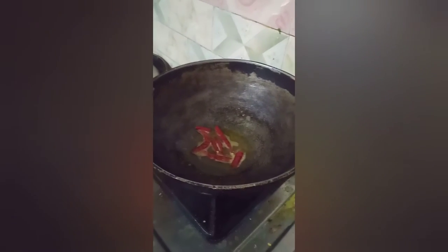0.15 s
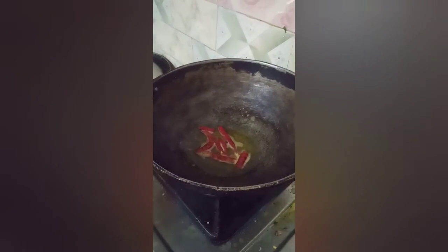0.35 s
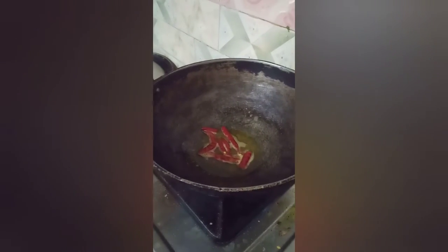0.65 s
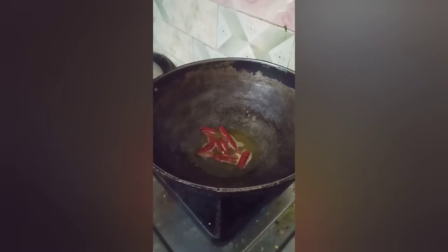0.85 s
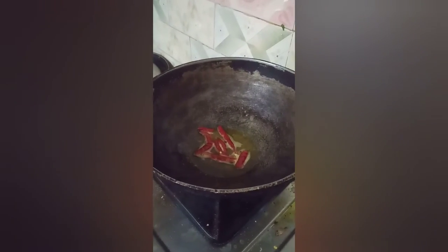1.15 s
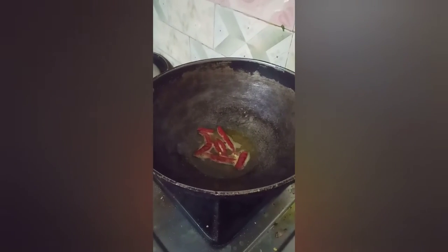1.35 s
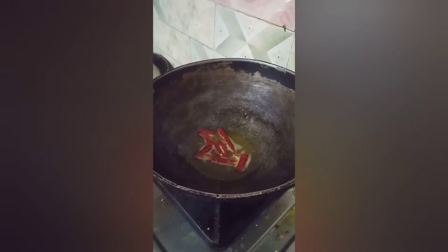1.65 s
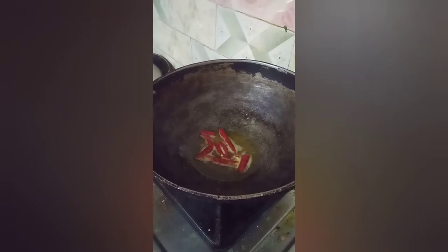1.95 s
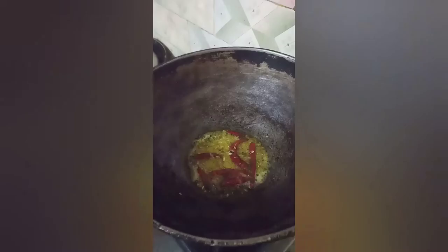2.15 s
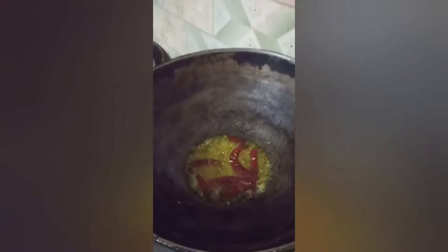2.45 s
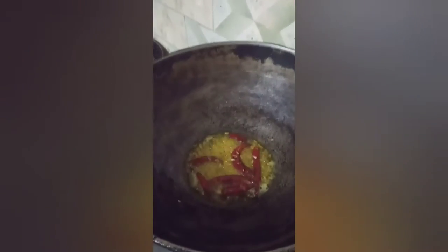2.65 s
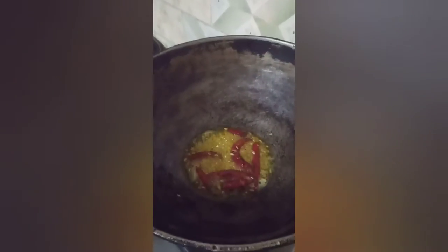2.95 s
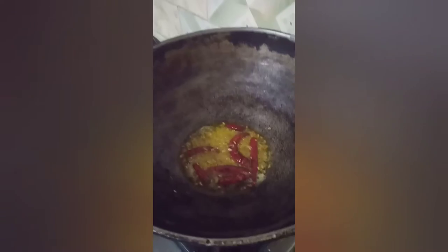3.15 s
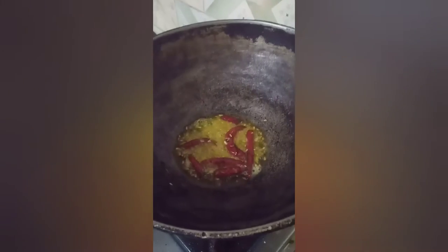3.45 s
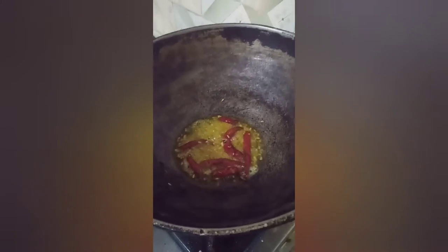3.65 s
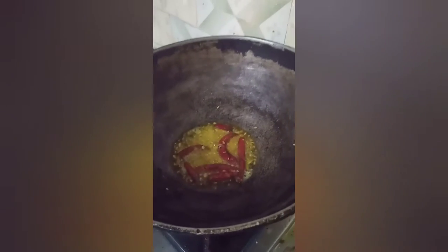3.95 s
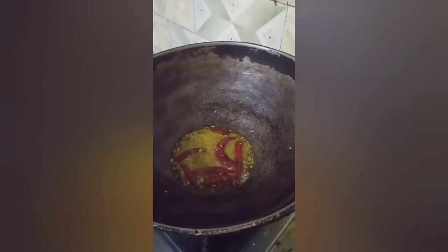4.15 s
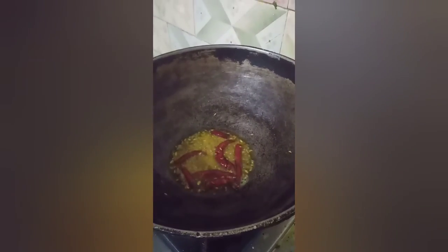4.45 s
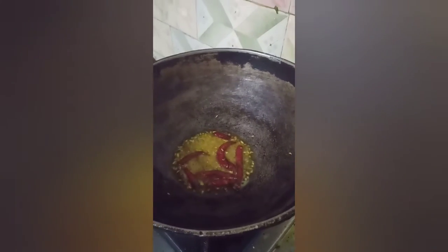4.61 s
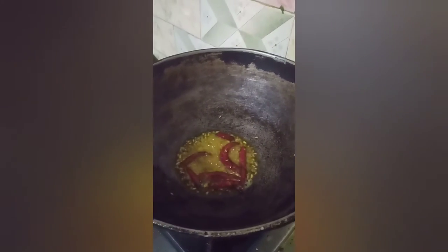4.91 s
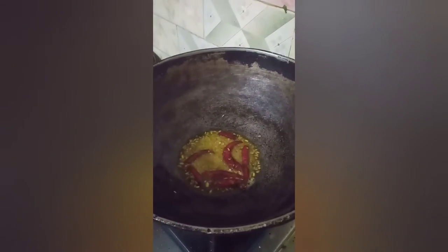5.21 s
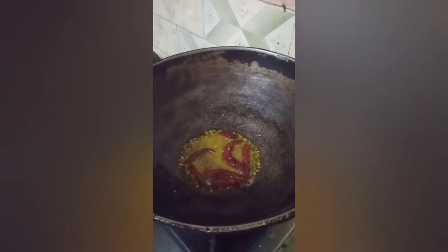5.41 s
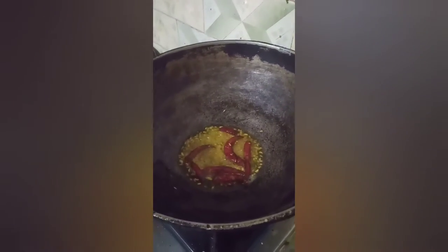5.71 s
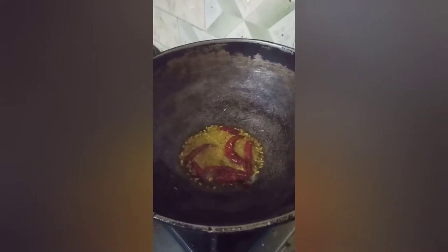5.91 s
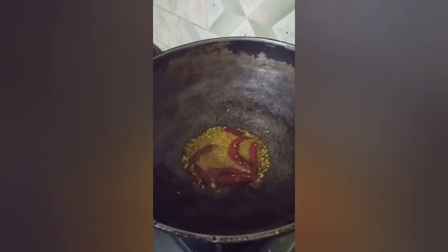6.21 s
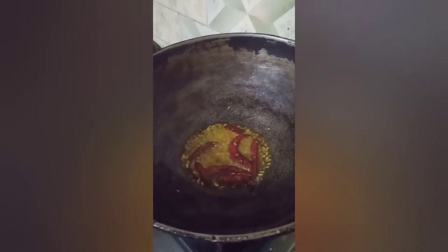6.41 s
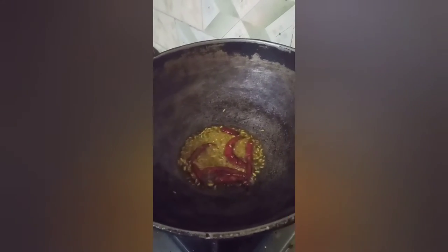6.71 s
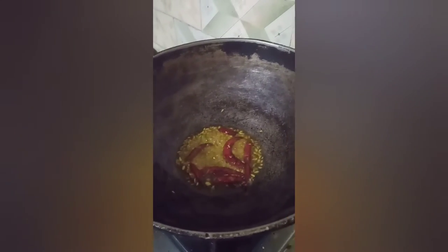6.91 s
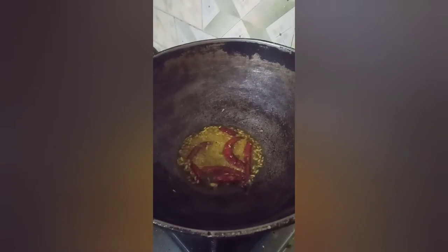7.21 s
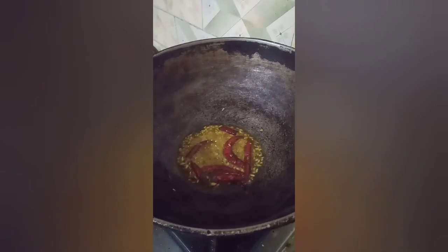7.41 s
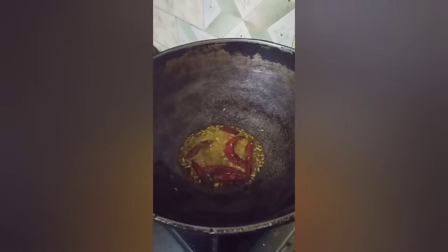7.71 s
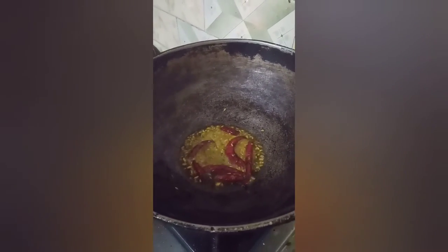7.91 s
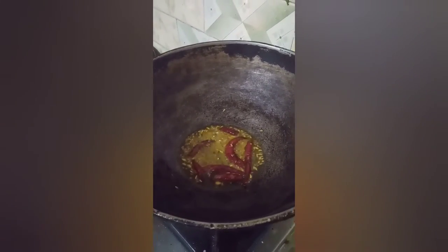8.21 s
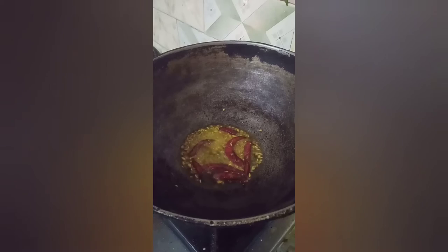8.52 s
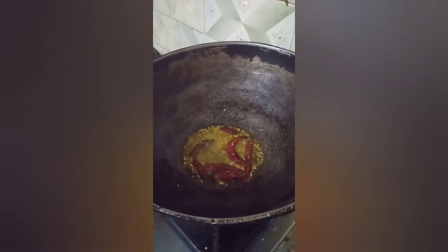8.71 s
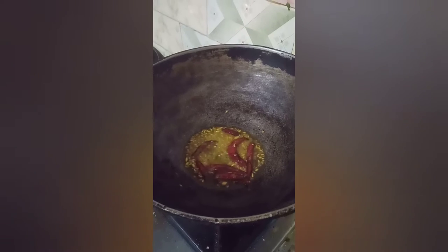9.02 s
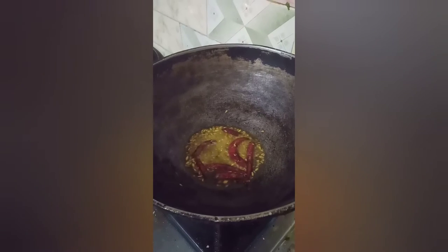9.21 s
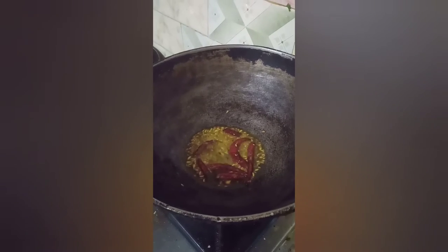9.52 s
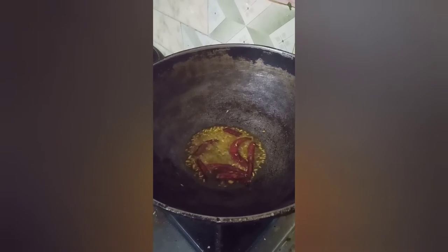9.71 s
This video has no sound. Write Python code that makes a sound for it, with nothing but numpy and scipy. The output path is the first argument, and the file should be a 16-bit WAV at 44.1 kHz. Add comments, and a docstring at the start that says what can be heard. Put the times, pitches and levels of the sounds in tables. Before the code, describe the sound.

Dried chillies and seeds frying, captured by a nearby phone with little room sound. Quiet, patchy fizzing starts it, almost silent, and drops out for an instant. Then sharp, bright cracks burst irregularly over a continuous airy sizzle, densest at first, later with small gaps. One muffled knock sounds before halfway, and a faint low rumble and two tiny soft blips come near the end.

```python
"""Chillies and seeds frying, close by

Dried chillies and seeds fry in oil in a deep iron pan, close to a phone.
First a faint fizz of bubble noise with small puffs of steam; the level dips briefly, then the oil is hotter.
Seeds pop (short rings, cracks and pushes of air) over a steady sizzle, louder for a moment after each pop.
A few short soft tones and thin wavering ones lie underneath; now and then low resonant noise rumbles
from the kitchen, and one dull knock sounds there."""
import sys
import numpy as np
from scipy import signal
from scipy.fft import rfft, irfft, next_fast_len
from scipy.io import wavfile
from scipy.ndimage import uniform_filter1d

SR = 44100
rng = np.random.default_rng(int(sys.argv[2]) if len(sys.argv) > 2 else 0)


def wrap_up_sound(samples):
    """Save the sound to the file named by the first command line argument, as 16-bit audio."""
    columns = np.atleast_2d(samples).T
    # keep every value between -1 and 1, then stretch to whole-number steps
    tamed = np.clip(columns, -1, 1)
    steps = np.round(tamed * 32767).astype(np.int16)
    wavfile.write(sys.argv[1], SR, steps)


N = 434826
T = np.arange(N) / SR


def gain_of(db):
    """Decibels to an amplitude factor."""
    return 10 ** (np.asarray(db) / 20)


def evened(x):
    """Scales to rms 1."""
    return x / np.sqrt(np.mean(x ** 2) + 1e-20)


def read(points, hz):
    """Reads a table of (frequency, level) at the given frequencies, straight lines over log frequency."""
    point_hz, value = np.transpose(points)
    return np.interp(np.log(hz + 1), np.log(point_hz + 1), value)


def colour(x, points):
    """Filters x by a spectrum table and scales it to rms 1."""
    size = next_fast_len(len(x))
    gain = gain_of(read(points, np.fft.rfftfreq(size, 1 / SR)))
    return evened(irfft(rfft(x, size) * gain, size)[:len(x)])


def band(x, lo_hz, hi_hz, order=2):
    """Band-pass."""
    sos = signal.butter(order, [lo_hz, hi_hz], "band", fs=SR, output="sos")
    return signal.sosfilt(sos, x)


def modes(x, table):
    """Sum of resonances, each of peak gain 1 before its level."""
    return sum(gain_of(db) * signal.lfilter(*signal.iirpeak(hz, hz / width_hz, SR), x)
               for hz, width_hz, db in table)


def bubbles(per_s, spread_db, smooth):
    """Tiny noise bursts of unequal size at random moments, over a smooth hiss."""
    strikes = rng.random(N) < per_s / SR
    size = gain_of(spread_db * np.minimum(rng.exponential(1, N), 5)) * strikes
    bursts = signal.lfilter([1], [1, -.93], size) * rng.standard_normal(N)
    return evened(bursts) + smooth * rng.standard_normal(N)


def pop(db, hz, low_db, top_db, draw):
    """One burst: a short ring of the bubble, a crack of treble and a push of air."""
    t = np.arange(len(draw)) / SR
    rise = 1 - np.exp(-t / .00015)
    # the ring grows and dies within a few of its own cycles
    ring = np.sin(2 * np.pi * hz * t) * np.exp(-t * hz / 2.98) * (1 - np.exp(-t * hz / 0.78))
    crack = draw * np.exp(-t / .0004) * rise
    near_ring = band(crack, 0.5 * hz, min(1.4 * hz, 15000))
    body = ring / abs(ring).max() + 4.17 * near_ring + 0.55 * band(crack, 2040, 6500)
    top = band(draw * np.exp(-t / .0005) * rise, 7200, 15500)
    push = band((1 - t / 0.00018) * np.exp(-t / 0.00015) * rise, 86, 7800)
    body, top, push = (part / abs(part).max() for part in (body, top, push))
    return gain_of(db) * (body + gain_of(top_db) * top + gain_of(low_db) * push)


def popping():
    """Each pop echoes off the hob, rings the pan; a short burst of louder sizzle follows, dull or bright like it."""
    # seeds and water pockets bursting: start_s, body_peak_db, ring_hz, push_db and top_db (against body),
    # sizzle_db (the louder sizzle after it, against body_peak_db)
    pops = [(1.437, -44.5, 6740, -51, -41, -18), (1.9716, -55, 6170, 6.5, -35, -21),
            (2.3167, -25, 5100, -30, -12, -17), (2.387, -34.5, 6030, -15, -17, -16),
            (2.4745, -46, 3570, 2, 8, -28), (2.4816, -25.5, 5900, -11.5, 3.5, -20.5),
            (2.5498, -35, 5500, -23, -4, -37), (2.5544, -24, 5900, -14, 1, -22),
            (2.6387, -23, 7340, -17, 2, -28), (2.653, -26, 6400, -24, 4, -25),
            (2.6595, -33, 5860, -58, -20, -11.5), (2.7133, -27, 6100, -54, 5, -27),
            (2.7485, -23.5, 3030, -99, -67, -13.5), (2.8717, -31, 5960, -0.5, -1.5, -12),
            (2.884, -32, 4970, -5.5, -13, -29), (2.9277, -24, 5450, -56, -17, -52),
            (2.964, -24.5, 7000, -36, -1, -32), (2.9769, -33, 2080, -9.5, -46, -18),
            (3.044, -21.5, 5900, -56, 0.5, -23), (3.1327, -30.5, 4580, -58, -41, -31),
            (3.2829, -32.5, 6000, -26, 2.5, -24), (3.2918, -26.5, 6200, -18, 5, -48),
            (3.4146, -25.5, 6300, -19.5, -1.5, -14), (3.4386, -29, 5530, -44, -22, -33),
            (3.4478, -38, 4930, -37, -4.5, -35), (3.471, -21, 6500, -5.5, 3, -43),
            (3.5163, -25, 6400, -99, -12, -18), (3.5585, -32, 6000, -62, -30, -40),
            (3.611, -38, 4900, -57, -18, -22), (3.6465, -40.5, 2280, -100, -27, -13),
            (3.66, -27.5, 5700, -67, -25, -17), (3.8239, -28, 8100, -29, -5, -17),
            (3.8941, -35, 2060, -70, -33, -19), (4.0311, -23.5, 5100, -55, -33, -9),
            (4.0466, -29, 4020, -37, -25, -34), (4.0757, -26.5, 5850, -26, -21, -37),
            (4.0807, -37, 2020, -10, -37, -15.5), (4.1221, -20.5, 6050, -52, -24, -44),
            (4.1593, -30.5, 4000, -37, -58, -7), (4.283, -33.5, 5660, -36, -30, -20),
            (4.346, -30, 5800, -30, -43, -11), (4.3867, -31, 3120, -35, -43, -23),
            (4.3909, -34, 2130, -25, -33, -27), (4.4954, -23.5, 6500, -24, -18, -9.5),
            (4.5128, -33, 2205, -30, -56, -13.5), (4.5538, -30.5, 6070, -41, -31, -34),
            (4.5992, -45.5, 7450, -18, -1.5, 4.5), (4.8351, -21.5, 5340, -17, -15, -20.5),
            (4.839, -21.5, 7800, -25, -14.5, -41), (5.0257, -39, 6700, -20.5, -5, -8.5),
            (5.1027, -31.5, 5840, -56, 1, -27), (5.1701, -27, 6300, -28, -45, -8),
            (5.175, -22.5, 6500, -33, -3, -41), (5.1986, -19.5, 5500, -30.5, -48, -20.5),
            (5.2116, -38, 5300, -39, -30, -35), (5.2532, -31.5, 5240, -35, -51, -16),
            (5.5646, -19.5, 5300, -12.5, -1.5, -22.5), (5.696, -26.5, 6200, -64, -29, -42),
            (5.8302, -47, 5800, -48, -20, -20), (5.9124, -34.5, 6300, -70, 0.5, -12.5),
            (5.9337, -40.5, 4200, 4, -22, -25), (5.9404, -30, 5900, -4, 1, -16),
            (6.1368, -30.5, 6950, 6.5, 9.5, -12.5), (6.2266, -26, 9400, -25, -10, -21.5),
            (6.3162, -24.5, 5350, -47, -22, -18.5), (6.451, -26, 5070, -67, -19, -46),
            (6.552, -39, 4500, -48, -12, -33), (6.7017, -30.5, 6250, -30, 1.5, -20.5),
            (6.8237, -37, 5940, -50, -26, -44), (6.8524, -28, 5200, -33, -56, -9.5),
            (6.8688, -37, 3080, -19.5, -38, -61), (7.1621, -44, 2150, -79, -38, -4.5),
            (7.4155, -36.5, 2030, -50, -57, -16.5), (7.5575, -31, 6640, -62, -3, -18.5),
            (7.6267, -41.5, 6260, -25, -6, -3), (7.6871, -25.5, 6400, -25, -14, -14.5),
            (7.7281, -23, 5190, -54, -30, -53), (7.7578, -32.5, 4030, -30, -35, -20),
            (7.864, -46, 4020, -12, -3, -28), (7.8709, -29, 4070, -14.5, -1, -19),
            (7.9012, -29.5, 5300, -9.5, 2, -21), (7.9819, -38, 4050, -9, -13, -11),
            (8.09, -27.5, 3900, -76, -40, -10), (8.504, -24.5, 5400, -73, -29, -15),
            (8.758, -28.5, 5300, -57, -19, -68), (8.8463, -29.5, 4760, -79, -14, -34),
            (9.0285, -26, 8800, -51, -25, -23), (9.0651, -31.5, 5740, -4, 10, -23.5),
            (9.2593, -21, 4680, -67, -41, -26), (9.311, -32.5, 5700, -53, 1, -18.5),
            (9.429, -39, 3110, -55, -33, -30), (9.5298, -38.5, 3200, -62, -6, -12),
            (9.5612, -29, 4740, -33, -48, -13.5), (9.6611, -30, 6000, -48, -12, -33),
            (9.665, -33, 2330, -36, -44, -14.5), (9.753, -23, 5650, -42, -43, -12.5),
            (9.805, -22.5, 3320, -43, -47, -20), (9.839, -25.5, 2280, -21, -35, -18)]
    # colour of the louder sizzle: frequency_hz, density_db (per Hz, relative)
    sizzle_colour = [(88, -22), (293, -21.5), (656, -10.5), (916, -4.5), (1380, 0.5), (3230, 1.5),
                     (6550, 8), (8130, 0.5), (15000, -4), (16500, -2.5)]
    # air in the pan: resonance_hz, width_hz, level_db
    bowl = [(2070, 900, -4), (3200, 900, -7), (5540, 800, -5)]
    # up out of the curved pan, then two near surfaces: delay_s, level_db, factor (with sign)
    paths = [(0, 4, 0.92), (.0049, -2.5, 0.28), (.0066, -13.5, -1)]
    dull_per_push, plain_push_db = 0.16, -26.5  # duller sizzle after deep pops
    dull_db_per_octave, plain_ring_hz = 11, 4300
    bright_per_top, plain_top_db = 0.6, -13  # brighter sizzle after sharp pops

    # pops from three parts of the pan; sizzle power in three ranges: dull, middle, bright
    dry, sizzle_power = np.zeros((3, N + 400)), np.zeros((3, N))
    for k, (start_s, db, hz, low_db, top_db, sizzle_db) in enumerate(pops):
        draw = rng.standard_normal(400)
        at = round(start_s * SR)
        dry[k % len(dry), at:at + 400] += pop(db, hz, low_db, top_db, draw)
        dull_db = dull_per_push * (low_db - plain_push_db) - dull_db_per_octave * np.log2(hz / plain_ring_hz)
        bright_db = bright_per_top * (top_db - plain_top_db)
        sizzle_power[:, at] += gain_of(2 * (db + sizzle_db + np.array([dull_db, 0, bright_db])))
    dry = dry[:, :N]
    dry = dry + modes(dry, bowl)

    # each part of the pan has its own reverberation, 60 dB down in 0.12 s
    t = np.arange(5000) / SR
    tail = band(rng.standard_normal((len(dry), 5000)), 610, 18000)
    tail = tail * gain_of(-60 * t / 0.12) * np.clip(t / 0.0033, 0, 1)
    tail = 0.57 * tail / np.linalg.norm(tail[0])
    for delay_s, db, factor in paths:
        tail[:, round(delay_s * SR)] += factor * gain_of(db)
    echoing = signal.oaconvolve(dry, tail, axes=1)[:, :N].sum(0)

    # the louder sizzle swells a moment after the pop; its power fades out within 0.11 s
    swell = 1 - np.exp(-t / .004)
    fading = swell * gain_of(-120 * t / .5) * np.cos(np.pi / 2 * t / t[-1]) ** 2
    envelopes = np.sqrt(abs(signal.oaconvolve(sizzle_power, fading[None])[:, :N]))
    sizzle = colour(bubbles(1800, 2.4, 0.75), sizzle_colour)
    dull = band(sizzle, 60, 2800, order=1)
    bright = band(sizzle, 8000, 21000, order=1)
    ranges = [dull, sizzle - dull - bright, bright]
    return echoing + (envelopes * ranges).sum(0)


def fizz():
    """Sizzle of fine steam bubbles with puffs of steam on top, each duller or brighter; patchier in the low range."""
    # level over time: time_s, level_db, low_db (lower middle raised by), top_db (top raised by)
    fizzing = [(0, -59.5, 5.5, -12), (.25, -59, 11.5, -5), (.45, -80, 6, -55), (.66, -63, 7.5, -5),
               (1.03, -66.5, 9.5, -13), (1.33, -70.5, 9, -24), (1.8, -70, 11, -2), (2.13, -66.5, 7.5, -14),
               (2.28, -63, 7, -7), (2.4, -54, 5, -8), (3.2, -49.5, -1.5, -9), (7, -52.5, 1.5, -7.5),
               (9.86, -51, -2, -8.5)]
    # colour of the bubbles: frequency_hz, density_db (per Hz, relative)
    fizz_colour = [(120, -54), (200, -35.5), (997, -30.5), (1070, -91), (1270, -20), (1730, -17),
                   (2130, -12), (3500, -11.5), (5550, -4.5), (6430, -3), (7880, -14), (10200, -5.5),
                   (15000, -16), (16500, -37)]
    # puffs of steam while the oil warms: peak_s, peak_db, length_s, low_db, top_db (both raised by)
    puffs = [(0.321, -46.5, 0.13, 3.5, -9), (0.504, -60.5, 0.27, -27, -1), (.73, -57.5, 0.19, -35, 1),
             (1.053, -65.5, 1, -34, -3.5), (1.542, -51.5, 0.12, -0.5, -4), (1.884, -53.5, 0.11, 1, -5),
             (2.172, -53.5, 0.25, 2.5, -1.5)]
    puff_rise_s, puff_fade_db = 0.052, 19  # climbs by this in the rise, falls by it over its length

    hiss = colour(bubbles(630, 3.3, 1.62), fizz_colour)
    hz, t, z = signal.stft(hiss, SR, nperseg=512, noverlap=384)
    low = np.clip((3000 - hz) / 900, 0, 1)[:, None]
    top = np.clip((hz - 8000) / 3000, 0, 1)[:, None]
    time_s, *columns = np.transpose(fizzing)
    level_db, low_db, top_db = (np.interp(t, time_s, c) for c in columns)
    power = gain_of(2 * (level_db + low * low_db + top * top_db))
    for peak_s, db, length_s, low_db, top_db in puffs:
        away = np.maximum((peak_s - t) / puff_rise_s, (t - peak_s) / length_s)
        power += gain_of(2 * (db - puff_fade_db * away + low * low_db + top * top_db))

    # random patches: fine ones per bin, broad ones across neighbouring bins
    fine, broad = rng.standard_normal((*z.shape[::-1], 2)).T
    fine = evened(uniform_filter1d(fine, size=16, axis=1))
    broad = uniform_filter1d(broad, size=24, axis=1)
    broad = evened(uniform_filter1d(broad, size=9, axis=0))
    patches_db = (1.6 + .3 * low) * fine + 1.3 * broad
    shaped = z * np.sqrt(power) * gain_of(patches_db)
    return signal.istft(shaped, SR, nperseg=512, noverlap=384)[1][:N]


def small_tones():
    """Narrow noise resonances waver as thin tones; short soft tones are sines, roughened and bending upward."""
    # thin tones under the fizz: tone_hz, width_hz, base_db, strongest_s
    thin_tones = [(1290, 50, -88, .5), (2030, 30, -81, 1.2)]
    # short soft tones, blips and one low tone within the rumble at 9.17 s:
    # centre_s, pitch_hz (at the centre), level_db
    short_tones = [(.885, 1270, -67), (1.1, 585, -67.5), (8.821, 2004, -47), (9.169, 322, -72.5),
                   (9.227, 1900, -49.5)]
    tone_cycles, tone_bend, tone_rough = 18, 0.025, 0.24

    out = np.zeros(N)
    for (hz, width_hz, db, strongest_s), slow in zip(thin_tones, rng.standard_normal((len(thin_tones), N))):
        wander_db = 1.5 * evened(uniform_filter1d(slow, size=6000))
        bump_db = 8 * np.exp(-((T - strongest_s) / .35) ** 2)
        tone = evened(modes(rng.standard_normal(N), [(hz, width_hz, 0)]))
        out += gain_of(db) * gain_of(wander_db + bump_db) * tone
    rough = 1 + tone_rough * evened(uniform_filter1d(rng.standard_normal(N), size=200))
    for centre_s, hz, db in short_tones:
        turns = (T - centre_s) * hz
        bent = turns * (1 + tone_bend * turns / tone_cycles / 2)
        out += gain_of(db) * rough * np.sin(2 * np.pi * bent) * np.exp(-(turns / tone_cycles) ** 2)
    return out


def kitchen():
    """Faint room tone, rumbles of noise in a few low resonances, and one dull knock on the same resonances."""
    # low resonances: resonance_hz, width_hz, level_db
    hum = [(116, 4, 0), (133.5, 5, -1), (183, 8, -3)]
    # upper resonances: resonance_hz, width_hz, level_db
    box = [(305, 19, 0), (402, 135, 0.5), (621, 21, -2.5)]
    # colour of the room tone: frequency_hz, density_db (per Hz, relative)
    room_colour = [(12, 2), (20, -12), (64, -10), (151, -3.5), (240, -13.5), (368, -12), (730, -18),
                   (1560, -13), (2640, -120)]
    # rumbles: start_s, length_s (until the release), level_db, upper_db (upper part against it)
    rumbles = [(0.71, 0.27, -68.5, 3), (4.126, 0.12, -70, 14), (4.55, 0.14, -49, -10),
               (5.62, 0.11, -68, -26), (6.106, 0.12, -66, -6), (9.019, 0.59, -61.5, -53),
               (9.708, 0.15, -60, -9)]
    # the knock's low modes, upper modes and rattle: level_db, t60_s
    knock = [(-39, 0.5), (-39, 0.28), (-34, 0.26)]
    room_db, knock_s = -76, 4.625
    rise_s, sag_db_per_s, release_db_per_s = 0.094, 27.5, 173  # release adds to the sag

    low, high = (evened(band(modes(rng.standard_normal(N), table), 55, 610)) for table in (hum, box))
    out = gain_of(room_db) * colour(rng.standard_normal(N), room_colour)
    for start_s, length_s, db, upper_db in rumbles:
        t = np.maximum(T - start_s, 0)
        fall_db = sag_db_per_s * t + release_db_per_s * np.maximum(t - length_s, 0)
        envelope = np.minimum(t / rise_s, 1) * gain_of(db - fall_db)
        out = out + envelope * (low + gain_of(upper_db) * high)

    t = np.maximum(T - knock_s, 0)
    rattle = evened(band(rng.standard_normal(N), 1500, 2800, order=1))
    # the sines of the low modes are in step 11 ms after the knock begins
    struck = sum(gain_of(db) * np.sin(2 * np.pi * hz * (t - .011)) for hz, _, db in hum)
    struck = np.sqrt(2 / len(hum)) * struck
    for (db, t60_s), part in zip(knock, (struck + 0.29 * low, high, rattle)):
        out = out + (1 - np.exp(-t / 0.0046)) * gain_of(db - 60 * t / t60_s) * part
    return out


def scene():
    """All in the middle; a phase-scrambled copy, strongest in the treble, sets left and right a little apart."""
    # stereo width: frequency_hz, side_db (against mid)
    stereo_width = [(300, -34), (3000, -32), (5000, -15), (9000, -10), (15000, -6)]
    mid = popping() + fizz() + small_tones() + kitchen()
    hz, _, z = signal.stft(mid, SR, nperseg=64)
    turned = z * np.exp(2j * np.pi * rng.random(z.shape[::-1]).T)
    side_gain = gain_of(read(stereo_width, hz))[:, None]
    side = signal.istft(turned * side_gain, SR, nperseg=64)[1][:N]
    return np.array([mid + side, mid - side])


def suppress(x):
    """The phone's noise suppressor: below the sizzle, bins near their usual floor are turned down."""
    hz, _, z = signal.stft(x, SR, nperseg=1024, noverlap=768)
    power = uniform_filter1d(abs(z) ** 2, size=7, axis=-1)  # over time
    power = uniform_filter1d(power, size=2, axis=1)  # over frequency
    power_db = 10 * np.log10(power.clip(1e-16))
    floor_db = np.percentile(power_db, 25, axis=-1, keepdims=True)
    nearness = np.clip(1 - (power_db - floor_db) / 4.4, 0, 1.5)
    below_sizzle = np.clip((4200 - hz) / 1500, 0, 1)[:, None]
    cut_db = -7.0 * nearness * below_sizzle
    return signal.istft(z * gain_of(cut_db), SR, nperseg=1024, noverlap=768)[1][:, :N]


def record(dry):
    """Noise suppressor; the sound drops out briefly and fades back in; then a steep low-pass."""
    # the drop-out: start_s, end_s, level_db
    drop_out = 2.178, 2.25, -36
    start_s, end_s, db = drop_out
    depth = (T > start_s) * np.clip((end_s - T) / .03, 0, 1)  # fades back over the last 30 ms
    out = suppress(dry) * gain_of(db * depth)
    edge_hz = 15900
    low_pass = signal.firwin(255, edge_hz, window=("kaiser", 9), fs=SR)
    return signal.oaconvolve(out, low_pass[None], "same")


dry = scene()
out = record(dry)
wrap_up_sound(out)
```